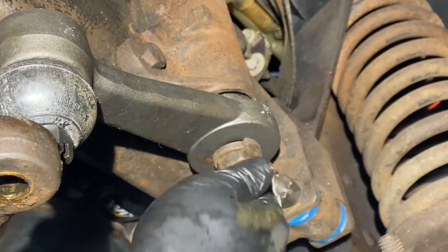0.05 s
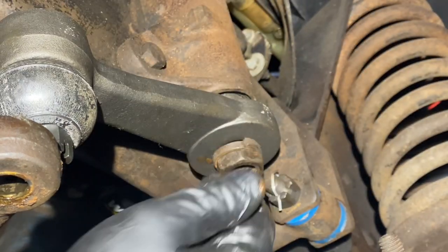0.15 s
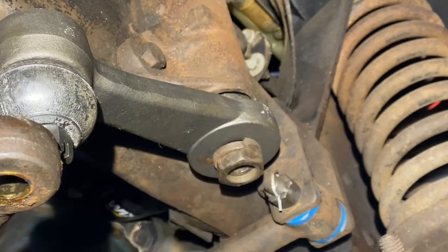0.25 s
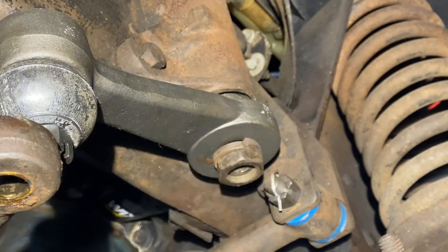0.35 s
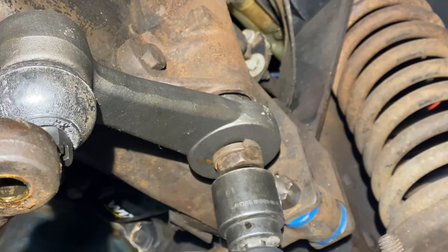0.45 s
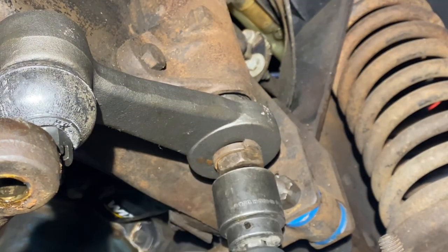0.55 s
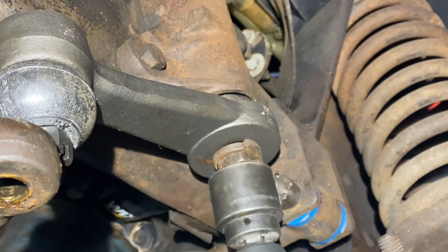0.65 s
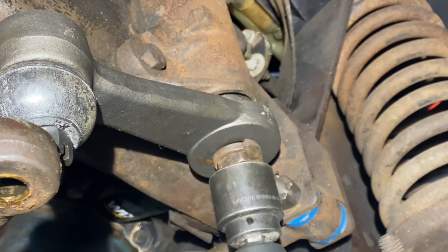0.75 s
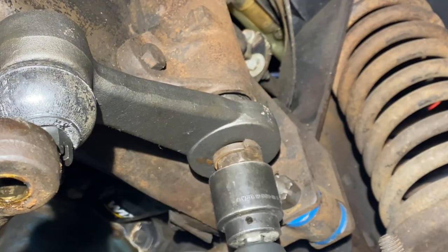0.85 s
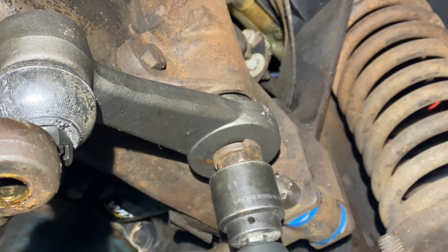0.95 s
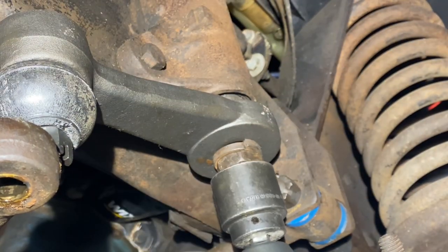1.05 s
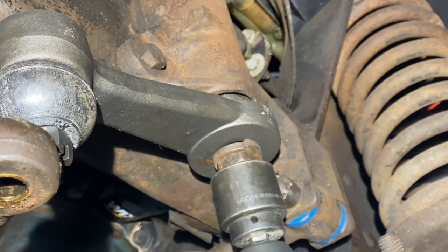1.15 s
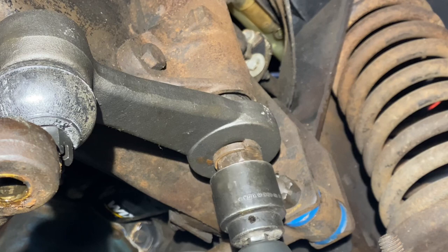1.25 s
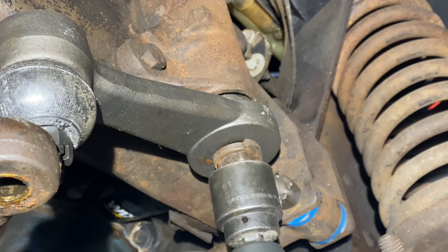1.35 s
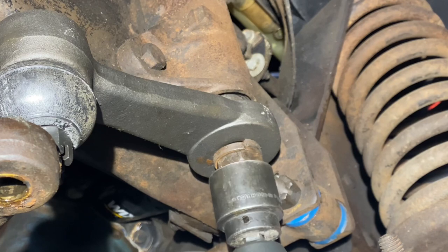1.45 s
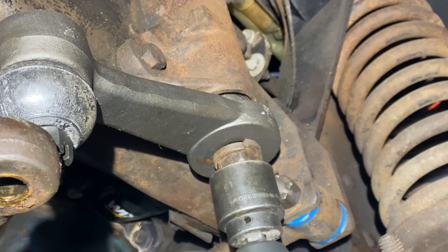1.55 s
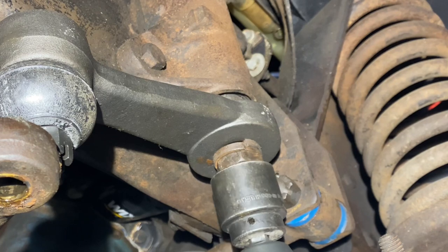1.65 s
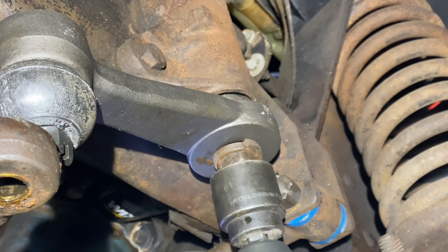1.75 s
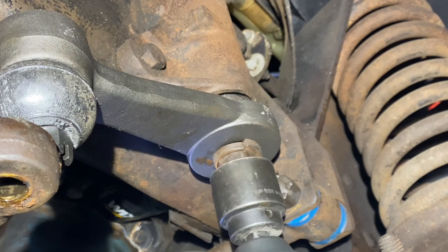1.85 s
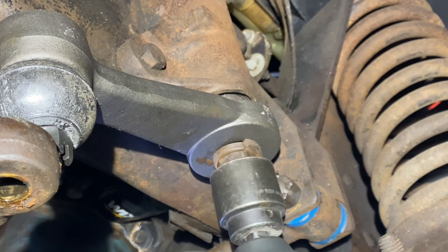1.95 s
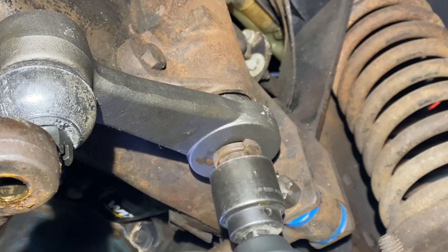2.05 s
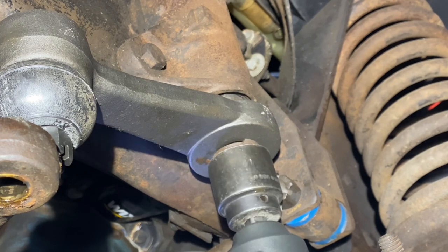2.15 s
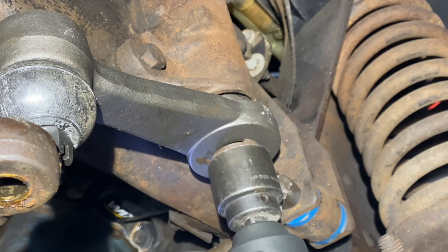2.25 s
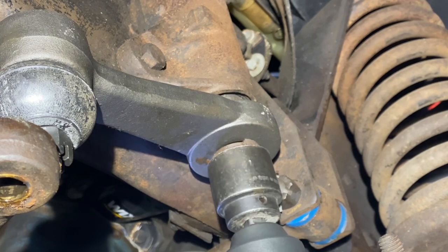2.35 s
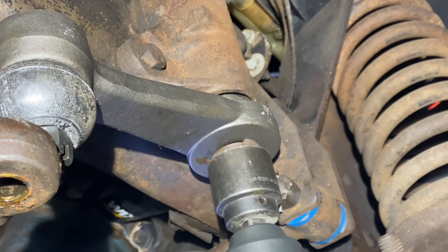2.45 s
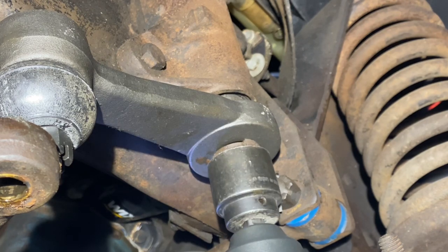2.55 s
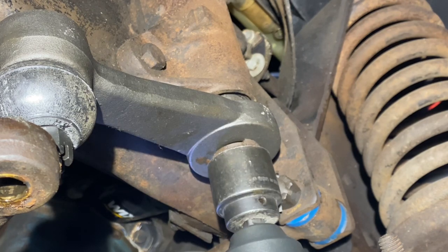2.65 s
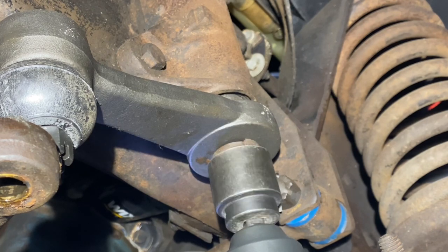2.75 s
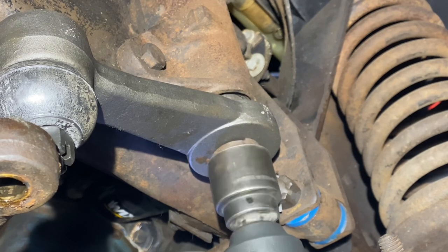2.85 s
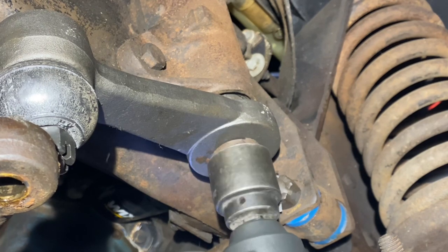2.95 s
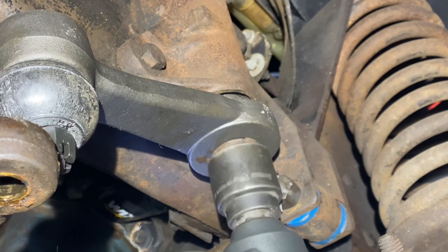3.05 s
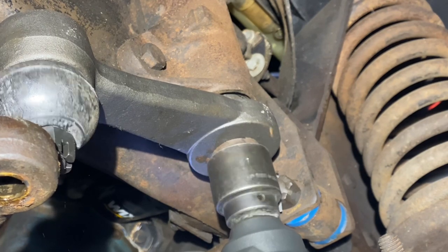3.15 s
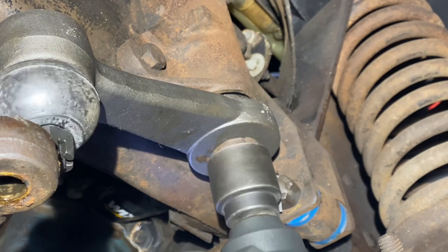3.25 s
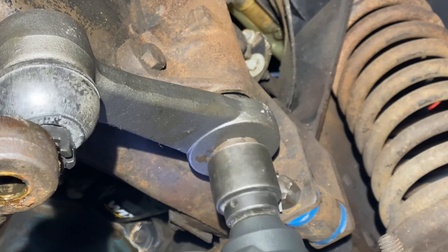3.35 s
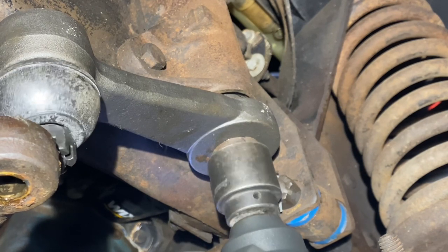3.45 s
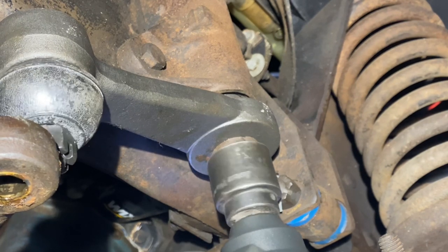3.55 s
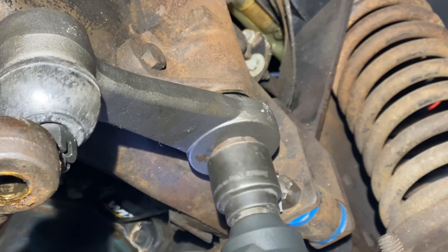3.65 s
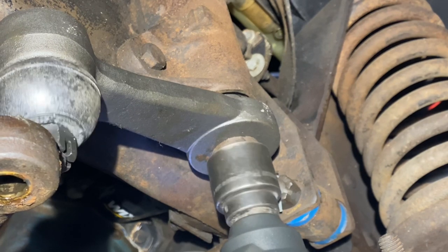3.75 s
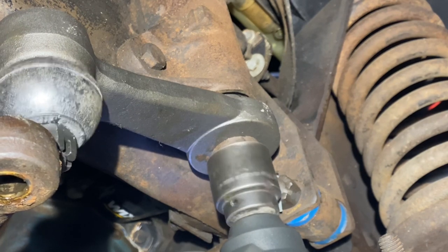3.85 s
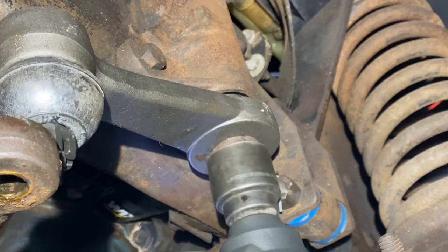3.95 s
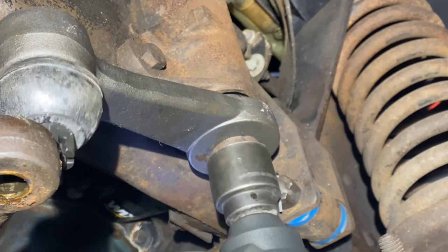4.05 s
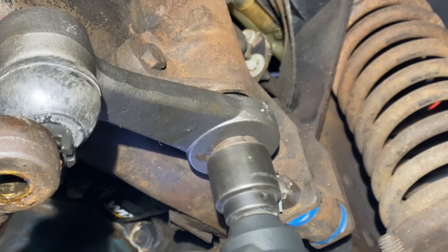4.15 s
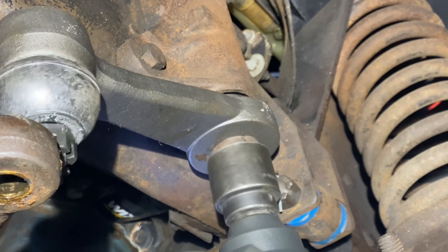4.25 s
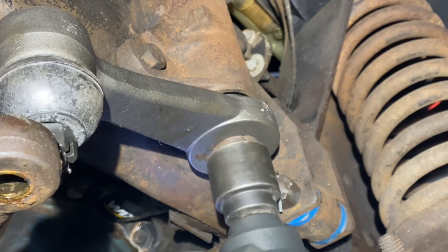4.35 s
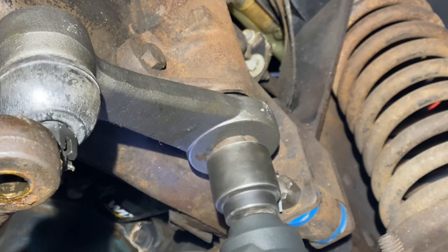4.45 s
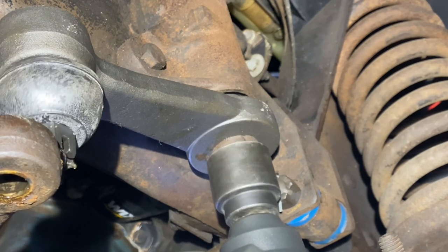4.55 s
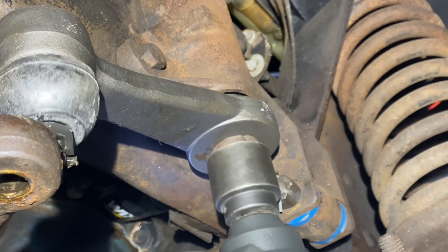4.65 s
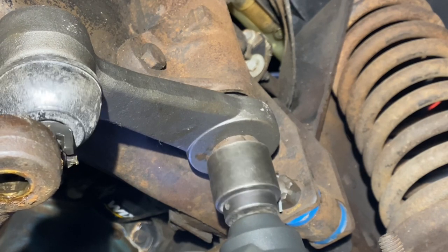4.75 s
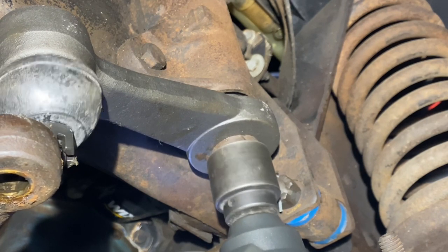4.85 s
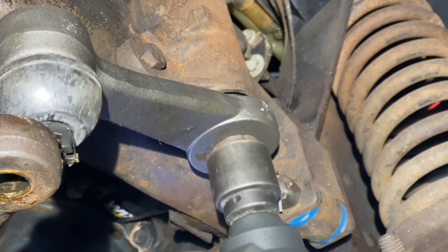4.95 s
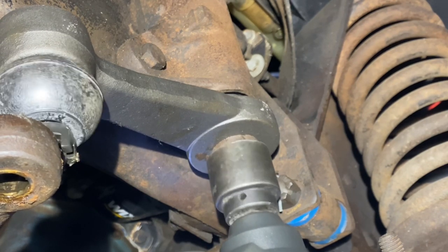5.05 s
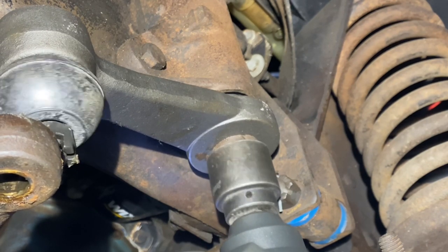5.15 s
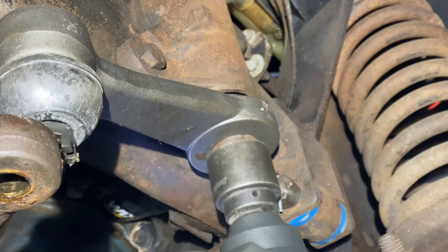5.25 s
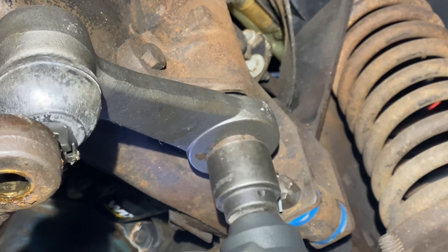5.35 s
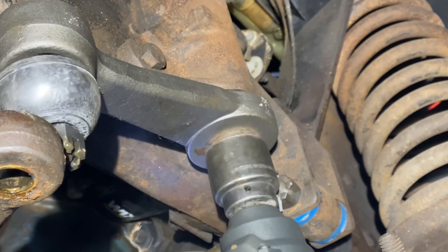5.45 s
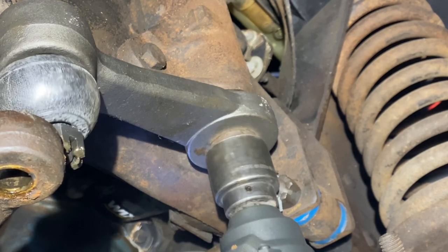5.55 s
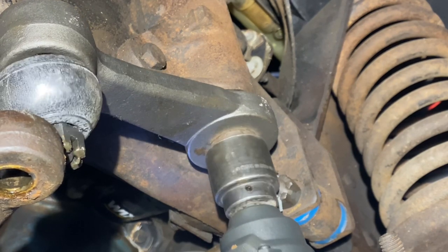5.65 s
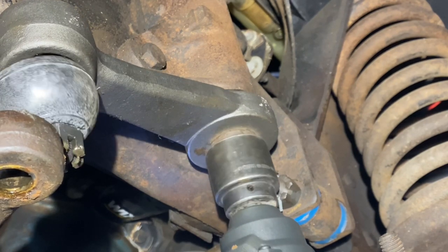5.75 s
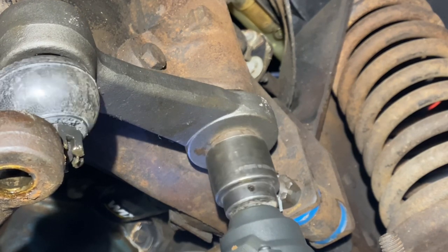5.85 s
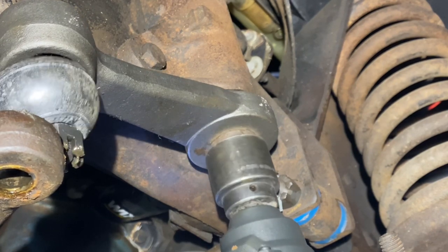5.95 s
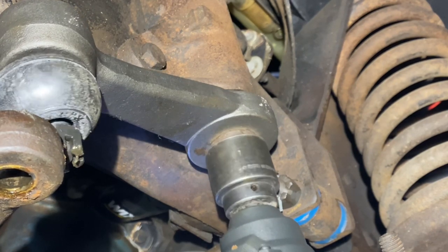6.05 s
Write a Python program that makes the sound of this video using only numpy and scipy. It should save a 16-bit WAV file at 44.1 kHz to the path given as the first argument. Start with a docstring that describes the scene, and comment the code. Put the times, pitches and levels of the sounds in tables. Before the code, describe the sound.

Quiet room hiss with a low hum drops out briefly, then a heavy steel socket knocks and scrapes onto a nut on a steering arm, with dull thuds, sharp cracks and short rings. After a short lull an impact wrench roars in, hammering about fifty blows a second, harsh and rattling, over a gear whirr. Close stereo microphones in a garage with a short echo.

```python
"""An impact wrench spins up and hammers a nut on a vehicle's steering arm, about fifty blows a second at speed.
Each blow is shaped noise with a rebound, over a gear whirr; it pushes the arm's resonances into shaking.
Before that, hiss opens the sound, then a steel socket is knocked onto the nut as fading tones and cracks.
Shaped noise makes the body boom and the rubbing; falling tones make the thumps.
The level dips briefly twice, and two spaced microphones hear it all in a garage."""
import sys
import numpy as np
from scipy import signal
from scipy.fft import rfft, irfft, next_fast_len
from scipy.io import wavfile

SR = 44100
rng = np.random.default_rng(int(sys.argv[2]) if len(sys.argv) > 2 else 0)


def rack_gain(trim_db):
    """Turn a fader trim in dB into the linear factor to multiply a signal by."""
    fader = np.asarray(trim_db, float)
    return 10 ** (fader / 20)


def bounce(signal):
    """Save signal as a 16-bit WAV file at the path given by the first command-line argument."""
    frames = np.transpose(np.atleast_2d(signal))
    limited = np.clip(frames, -1, 1)
    pcm = np.round(limited * 32767).astype(np.int16)
    wavfile.write(sys.argv[1], SR, pcm)


N = 269846  # length in samples


def unit(x):
    """Scale to rms 1."""
    return x / np.sqrt(np.mean(x ** 2) + 1e-20)


def along(points, hz):
    """Read a value between (frequency, value) points on a log frequency axis."""
    f, v = np.transpose(points)
    return np.interp(np.log(hz + 1), np.log(f + 1), v)


def curves(rows):
    """One value per sample for each column after the time; -120 outside the rows."""
    s, *cols = np.transpose(rows)
    return [np.interp(np.arange(N) / SR, s, c, -120, -120) for c in cols]


def filtered(x, response):
    """Shape x with a complex response of frequency."""
    m = next_fast_len(x.shape[-1] + 8192)
    return irfft(rfft(x, m) * response(np.fft.rfftfreq(m, 1 / SR)), m)[..., :x.shape[-1]]


def causal(gain):
    """The minimum-phase response with this gain: its sound starts at once, never early."""
    c = irfft(np.log(gain + 1e-6))
    c[1:len(c) // 2] *= 2
    c[len(c) // 2 + 1:] = 0
    return np.exp(rfft(c))


def resonances(modes, hz):
    """Sum of resonances, each answering most strongly at its own frequency; signs alternate."""
    total = 0
    for k, (centre, width, db) in enumerate(modes):
        spin = 1j * hz * width
        total = total + (-1) ** k * rack_gain(db) * spin / (centre * centre - hz * hz + spin)
    return total


# how alike left and right are: (frequency [Hz], likeness [0 to 1])
LIKENESS = [(40, 0.7), (150, 1), (300, 0.48), (800, 0.2), (3000, 0.071), (8000, 0.52), (15000, 0.85)]
# how far the left is ahead in phase: (frequency [Hz], lead [radians])
LEFT_LEAD = [(0, 0), (600, -0.2), (2150, 1.5), (2500, 1.3), (3010, -4.4), (3960, -5.7), (5510, -3.0),
             (6030, -2.9), (6550, 0.0), (8870, -2.7), (10200, -5.6), (11500, -6.5), (14800, -12.1),
             (16700, -12.8)]


def spaced(pair):
    """Two unrelated signals become left and right, partly alike and offset in phase."""
    def blend(hz):
        angle = np.arccos(np.clip(along(LIKENESS, hz), -1, 1)) / 2
        return np.array([np.cos(angle), np.sin(angle)])

    mid, side = filtered(pair, blend)
    stereo = np.array([mid + side, mid - side])
    return filtered(stereo, lambda hz: np.exp([[.5j], [-.5j]] * along(LEFT_LEAD, hz)))


def hiss(tone):
    """Stereo noise of rms 1 with this spectrum."""
    noise = rng.standard_normal((2, N))
    return unit(spaced(filtered(noise, lambda hz: rack_gain(along(tone, hz)))))


# how long the garage echoes: (frequency [Hz], time to fade by 60 dB [s])
GARAGE_FADE = [(200, 0.33), (1000, 0.29), (4000, 0.15), (12000, 0.042)]


def tail(seconds):
    """A stereo room echo made of noise: each frequency dies at its own speed."""
    noise = rng.standard_normal((2, int(seconds * SR)))
    hz, t, z = signal.stft(noise, SR, nperseg=256)
    fading = z * rack_gain(-60 * t / along(GARAGE_FADE, hz)[:, None])
    out = signal.istft(fading, SR, nperseg=256)[1]
    return out / np.linalg.norm(out[0])


def in_garage(dry):
    """The garage's echo of a stereo sound, cut to the same length."""
    return rack_gain(-5.5) * signal.fftconvolve(dry, tail(.4), axes=1)[:, :dry.shape[1]]


def placed(times, shapes):
    """Sum of stereo shapes (events x 2 x length), each starting at its time."""
    at = np.round(times * SR).astype(int)[:, None] + np.arange(shapes.shape[-1])
    return np.array([np.bincount(at.ravel(), shapes[:, c].ravel(), N + SR)[:N] for c in range(2)])


def bursts(times, db, t60, rise, same):
    """Short noise bursts that rise and fade; a share of each repeats from burst to burst."""
    t = np.arange(1500) / SR
    same = np.clip(same, 0, 1)
    common = rng.standard_normal((2, len(t)))
    fresh = rng.standard_normal((len(times), 2, len(t)))
    noise = same * common + np.sqrt(1 - same ** 2) * fresh
    envelope = rack_gain(-60 * t / t60) * (1 - np.exp(-t / rise))
    return placed(times, rack_gain(db)[:, None, None] * noise * envelope)


# the opening room hiss: (time [s], level [dB])
AIR_LEVEL = [(0.0, -56.5), (0.08, -54.5), (0.1, -48.5), (0.12, -54), (0.42, -56), (0.43, -67)]
# its colour: (frequency [Hz], relative level [dB])
AIR_COLOUR = [(18, -47), (30, -22.5), (118, 2), (280, -7.5), (512, -9), (616, -16.5), (913, -11),
              (1100, -17), (1430, -8), (2010, -13), (2350, -17), (4300, -17), (9220, -27), (9970, -24),
              (16000, -30)]


def room_air():
    """Noise as room hiss, with a thin resonant whistle and a low hum in it."""
    t = np.arange(N) / SR
    whistle = filtered(rng.standard_normal(N), lambda hz: resonances([(1396, 30, 0)], hz) ** 2)
    hum = np.sin(2 * np.pi * np.outer([62, 120], t)).sum(0)
    air = hiss(AIR_COLOUR) + rack_gain(-11.5) * unit(whistle) + rack_gain(-7) * hum
    return rack_gain(*curves(AIR_LEVEL)) * air


def booming(s, db, t60):
    """Power of the body's boom: a quick rise at each event, then an even decay."""
    rise_s = 0.013
    age = np.clip(np.arange(0, N, 32) / SR - s[:, None], 0, None)  # worked out every 32 samples
    rise = 1 - np.exp(-(age / rise_s) ** 2)
    power = (rack_gain(db[:, None] - 60 * age / t60) * rise) ** 2
    return np.repeat(power.sum(0), 32)[:N]


# shoves that boom the vehicle body: (time [s], boom level [dB], deep part level [dB])
BODY_SHOVES = [(.435, -37, -39.5), (.69, -35.5, -47), (.84, -53, -52.5), (1.1, -37.5, -40.5),
               (1.2, -40, -44), (1.33, -33.5, -36), (1.68, -43, -52), (1.825, -29.5, -43),
               (2.125, -24, -38.5), (2.715, -34.5, -47)]
# colour of the boom: (frequency [Hz], relative level [dB])
BOOM_COLOUR = [(15, -59), (25, -21.5), (75, -5), (240, -9), (381, -23), (510, -30), (671, -37),
               (1100, -38.5), (1500, -52.5), (1950, -101), (3300, -120)]
# colour of its lowest part: (frequency [Hz], relative level [dB])
DEEP_COLOUR = [(20, -29), (40, -12.5), (65, 4.5), (100, -5.5), (160, -29), (300, -120)]


def body_boom():
    """The vehicle body booms after shoves and thumps; after shoves its lowest part lasts longer."""
    t = np.arange(N) / SR
    shove_t60_s, deep_t60_s, thump_t60_s = 0.92, 1.77, 0.59
    floor_db, thump_boom_db, thump_deep_db = -54.5, -11, -18.5
    shove_s, shove_db, deep_db = np.transpose(BODY_SHOVES)
    thump_s, thump_db, _ = np.transpose(FALLING_THUMPS)
    before = t < DIPS[1][0]  # thumps boom the body only before the second dip
    boom = booming(shove_s, shove_db, shove_t60_s) + rack_gain(floor_db) ** 2
    boom += before * booming(thump_s, thump_db + thump_boom_db, thump_t60_s)
    deep = booming(shove_s, deep_db, deep_t60_s)
    deep += before * booming(thump_s, thump_db + thump_deep_db, thump_t60_s)
    sound = np.sqrt(boom) * hiss(BOOM_COLOUR) + np.sqrt(deep) * hiss(DEEP_COLOUR)
    return (t > DIPS[0][0]) * sound


# glove and socket rubbing: (start [s], length [s], level [dB])
RUB_STROKES = [(.47, 0.0084, -61.5), (0.717, 0.017, -51.5), (1.07, 0.11, -56), (1.317, .2, -60.5),
               (1.799, 0.07, -44.5), (2.07, .04, -62.5), (2.118, .09, -49.5), (2.672, .06, -65)]
# its colour: (frequency [Hz], relative level [dB])
RUB_COLOUR = [(300, -20.5), (500, -2.5), (1130, -6), (1650, -12.5), (3750, -19.5), (6640, -25), (9000, -39),
              (11000, -23.5), (13000, -55), (16000, -57.5)]


def rubbing():
    """Glove and socket rub: coloured noise swells and fades around each stroke."""
    t = np.arange(N) / SR
    rise_db_s, fall_db_s, floor_db = 257.5, 229, -77  # first two in dB a second
    level = rack_gain(floor_db)
    for s, length, db in RUB_STROKES:
        early = np.clip(s - t, 0, None)
        late = np.clip(t - s - length, 0, None)
        level = level + rack_gain(db - rise_db_s * early - fall_db_s * late)
    # gritty: the level jumps every 3 ms
    grit_db = 3.5 * np.repeat(rng.standard_normal(N // 128 + 1), 128)[:N]
    return (t > DIPS[0][0]) * level * rack_gain(grit_db) * hiss(RUB_COLOUR)


# socket contacts: (time [s], crack level [dB], thud level [dB], ring level [dB], tick [Hz])
CONTACTS = [(0.436, -65, -44.5, -54.5, 2740), (0.4689, -54, -37, -48, 2690), (0.6669, -41, -29, -40, 4420),
            (0.691, -33, -46, -25.5, 4800), (0.701, -19.5, -27.5, -21.5, 2700),
            (1.068, -10, -11.5, -11, 2320), (1.1543, -20.5, -18, -15.5, 2620),
            (1.3399, -21, -31, -29.5, 4600), (1.3443, -40, -19, -31.5, 4940),
            (1.3876, -15.5, -34, -30, 2400), (1.5616, -55, -50.5, -73, 2720),
            (1.7052, -29.5, -19.5, -19, 3080), (1.7903, -15.5, -38, -28.5, 3820),
            (1.8416, -23.5, -24.5, -40, 2620), (1.8514, -16, -28.5, -33, 3320),
            (2.0157, -44, -46, -61, 3700), (2.0637, -39.5, -40, -44, 2680), (2.14, -22, -20.5, -27.5, 3200),
            (2.1467, -43, -22.5, -43, 2860)]
# ringing tones of the steering arm: (frequency [Hz], level [dB], time to fade by 60 dB [s])
ARM_MODES = [(250.3, -3, 0.11), (334, 2.5, 0.044), (702, -5.5, 0.041), (812, -14.5, 0.075),
             (1060, 2.5, 0.022), (1437, 1.5, 0.024), (1600, -15.5, 0.044), (2014, -12.5, 0.04),
             (2264, -24, 0.044), (2920, -36.5, .06), (3593, -31, .04), (3980, -30, 0.022),
             (5163, -29, 0.032), (7400, -30, 0.024)]
# colour of the crack: (frequency [Hz], relative level [dB])
CRACK_COLOUR = [(290, -54), (500, 2), (855, -5.5), (1140, -3), (3860, -14.5), (5160, -15.5), (10700, -22.5),
                (13100, -22.5), (16000, -43.5)]


def knocks():
    """Each contact thuds and rings the arm at new strengths, cracks, and fills the garage."""
    t = np.arange(2 * SR // 5) / SR
    soft_shift = 0.51  # the duller a contact, the more it favours the lowest mode [dB per dB]
    shapes = []
    for s, crack_db, thud_db, ring_db, tick_hz in CONTACTS:
        ring = 0
        for hz, level, t60 in ARM_MODES:
            db = level + (thud_db if hz < 500 else ring_db) + rng.normal(0, 3.45)
            if hz < 300:
                db += soft_shift * (thud_db - ring_db) - 3
            phase = [[0], [rng.normal(0, 1.0)]]  # left, right
            ring = ring + rack_gain(db - 60 * t / t60) * np.sin(2 * np.pi * hz * t + phase)

        def crack_response(hz):
            tick = 1 + np.abs(resonances([(tick_hz, 400, 9)], hz))
            return causal(rack_gain(along(CRACK_COLOUR, hz)) * tick)

        fade = rack_gain(-60 * t / 0.064) + 0.94 * rack_gain(-60 * t / 0.0066)
        crack = filtered(rng.standard_normal((2, len(t))) * fade, crack_response)
        contact = ring * (1 - np.exp(-t / 0.0026)) + rack_gain(crack_db) * crack / np.abs(crack).max()
        # the underbody swallows treble
        wet = filtered(in_garage(contact), lambda hz: 1 / (1 + 1j * hz / 2500))
        shapes.append(contact + wet)
    return placed(np.array(CONTACTS)[:, 0], np.array(shapes))


# the one socket mode that rings on: (frequency [Hz], time to fade by 60 dB [s])
SINGING_MODE = 1174, .5
# contacts that leave the socket singing: (time [s], level [dB])
SINGING_STARTS = [(0.701, -50), (1.067, -40), (1.1543, -36.5), (1.7053, -43), (1.7903, -53), (1.8416, -57)]


def singing():
    """One socket mode rings on after a contact, wavering a little."""
    s, db = np.transpose(SINGING_STARTS)
    hz, t60 = SINGING_MODE
    t = np.arange(2 * SR // 5) / SR
    drift = np.cumsum(rng.standard_normal((len(s), 1, len(t))), -1) * .012
    wave = np.sin(2 * np.pi * hz * t + drift + [[0], [.8]])
    tone = wave * rack_gain(-60 * t / t60) * (1 - np.exp(-t / .004))
    return placed(s, rack_gain(db)[:, None, None] * tone)


# the running wrench: (time [s], blow level [dB], whirr level [dB], level below 1.5 kHz [dB])
WRENCH_LEVELS = [(2.71, -42, -60, -2), (2.72, -20, -36, 1.5), (2.81, -4, -30, -1), (2.9, -5.5, -36, -1),
                 (3.2, -8, -27, 1.5), (3.35, -9, -34, 1), (3.5, -11, -27.5, -4.5), (3.6, -11, -37, -6.5),
                 (3.75, -10.5, -29.5, -2.5), (4.1, -11, -31.5, -1), (4.2, -11.5, -32, 1),
                 (4.78, -9.5, -34, 0), (5.42, -10, -35.5, -1), (5.45, -22, -50, -6), (5.47, -10, -34.5, -5),
                 (5.61, -10.5, -37.5, -1), (6.119, -8, -39, -2.5)]
# hammer timing: (time [s], blows struck so far [count])
BLOW_COUNT = [(2.8274, 0), (2.9315, 4), (3.0247, 8), (3.1594, 14), (3.3308, 22), (3.5388, 32), (3.8037, 45),
              (4.2061, 65), (4.7104, 90), (5.4383, 126), (5.4821, 127), (5.6848, 137), (5.8893, 147),
              (6.1137, 158)]
# colour of the gear whirr: (frequency [Hz], relative level [dB])
WHIRR_COLOUR = [(100, -36), (350, -18), (700, -7), (1400, 2.5), (2800, 2), (4000, -1), (6500, -6),
                (9000, -32), (10500, -19.5), (13000, -22.5), (16000, -37)]
# level around 4 kHz: (time [s], level [dB])
RASP_LEVEL = [(2.7, 0), (4.4, 0), (5.0, 0.5), (5.44, 3), (5.47, 0), (6.119, 0)]


def wrench():
    """Hammer blows, loose hits and cam knocks over the gear whirr; arm and body answer in step."""
    hammer_boom_db, restart_boom_db = -35.5, -4  # boom over the blow; change after the second dip
    blow_db, whirr_db, low_db = curves(WRENCH_LEVELS)
    s, count = np.transpose(BLOW_COUNT)
    chance = rng.standard_normal((int(count[-1]) + 1, 5))  # small differences from blow to blow
    beat = np.interp(np.arange(len(chance)), count, s)
    gap = np.gradient(beat)
    times = beat - .0004 + .0002 * chance[:, 0]
    at = (times * SR).astype(int)
    db = blow_db[at] + 1.1 * chance[:, 1]
    after = np.arange(N) > DIPS[1][0] * SR

    sharp = blows(times, gap, at, db, chance, after) + slips()
    struck = spaced(sharp + cam_knocks(times, gap, db, chance)) + in_garage(sharp)
    struck = struck + rack_gain(whirr_db) * hiss(WHIRR_COLOUR)

    low = filtered(struck, lambda hz: 1 / (1 + (hz / 1500) ** 4))
    rasp = filtered(struck, lambda hz: np.exp(-((hz - 4000) / 600) ** 2))
    struck = struck + (rack_gain(low_db) - 1) * low + (rack_gain(*curves(RASP_LEVEL)) - 1) * rasp
    balance = rack_gain([[.6], [-.6]])  # left a little louder than right [dB]
    boom = rack_gain(blow_db + hammer_boom_db + restart_boom_db * after) * hiss(BOOM_COLOUR)
    return (struck + arm_shake(beat, at, chance)) * balance + boom


# loose hits at spin-up: (time [s], level [dB])
LOOSE_HITS = [(2.7256, -5), (2.741, -5), (2.7551, -6), (2.7669, -3.5), (2.7725, -6.5), (2.7832, -4),
              (2.793, 0.5), (2.803, -10.5), (2.8105, -5.5)]


def slips():
    """Loose hits at spin-up: noise bursts through three broad resonances."""
    s, db = np.transpose(LOOSE_HITS)
    hits = bursts(s, db, 0.041, 0.00058, same=0)
    modes = [(1280, 800, -3), (3890, 1800, -1), (11020, 8100, -16)]  # (Hz, width Hz, dB)
    return filtered(hits, lambda hz: resonances(modes, hz))


# falling thumps: (time [s], level [dB], time to fade by 60 dB [s])
FALLING_THUMPS = [(2.784, -19.5, .06), (2.828, -15, 0.11), (2.907, -33, .06), (3.049, -19.5, .06),
                  (3.165, -18, 0.084), (3.184, -18.5, 0.1), (4.108, -25, 0.088), (4.38, -24, .06),
                  (4.599, -33, .07), (5.023, -24.5, .06), (5.065, -27, .06), (5.105, -26.5, 0.054),
                  (5.188, -34, .07), (5.503, -25, .04), (5.543, -29, 0.086), (5.665, -31.5, 0.072),
                  (5.789, -26.5, 0.068), (5.808, -31, .09), (5.828, -17.5, 0.027), (5.935, -25.5, 0.096),
                  (5.954, -25, 0.026), (5.974, -29.5, .08), (6.035, -28, 0.042), (6.074, -20.5, 0.032),
                  (6.095, -30, .08)]


def thumps():
    """Now and then a blow sends a bending wave along the steel: its high part arrives first."""
    s, db, t60 = np.transpose(FALLING_THUMPS)
    t = np.arange(SR // 10) / SR
    pitch_hz = 60 + 700 * np.exp(-t / 0.00504)
    phase = 1.6 * rng.standard_normal((len(s), 1, 1)) * [[.5], [-.5]]
    wave = np.sin(2 * np.pi * np.cumsum(pitch_hz) / SR + phase)
    sweep = wave * rack_gain(-60 * t / t60[:, None, None]) * (1 - np.exp(-t / 0.0021))
    return placed(s, rack_gain(db)[:, None, None] * sweep)


# colour of the blows, one list before the second dip and one after:
# (frequency [Hz], relative level [dB])
BLOW_COLOURS = ([(180, -29.5), (300, -2), (470, -9), (584, -2.5), (689, -10.5), (814, -4), (900, -11),
                 (1410, -4.5), (2030, -6), (2740, -2.5), (13100, -7), (15000, -8.5), (16000, -15.5)],
                 [(180, -33), (300, -11), (1170, -10), (1410, -8), (2250, -10), (2790, -2.5), (3350, -5),
                 (7320, -4), (9390, -9), (10700, -1.5), (13100, -13), (15200, -7.5), (16000, -17)])
# resonances of the socket: (frequency [Hz], width [Hz], level over the rest [dB])
SOCKET_MODES = [(1337, 104, 1), (2740, 227, 0.5), (4080, 140, -6), (5110, 750, -5.5), (6120, 95, -2.5),
                (7230, 100, -20), (10540, 135, -3), (11770, 82, 0)]


def blows(times, gap, at, db, chance, after):
    """Each hammer blow snaps, rebounds and chatters; the socket's resonances colour the noise."""
    rebound_db = curves(BLOW_GRIP)[3]
    # the treble snaps and is gone, the body of the blow lasts longer
    snap = bursts(times, db + 3.5, 0.016, 0.00059, same=0.1)
    body = bursts(times, db + 0.72, 0.024, 0.00084, same=.5)
    hits = filtered(snap, lambda hz: 1j * hz / (7000 + 1j * hz))
    hits += filtered(body, lambda hz: 1 / (1 + 1j * hz / 7000))
    rebound_s = times + .4 * gap + .0004 * chance[:, 2]
    hits += bursts(rebound_s, db + rebound_db[at] + 5.0 * chance[:, 3], 0.016, 0.00046, same=0.12)
    # the socket chatters on the nut just after the blow
    chatter_s = times + .0035 + .001 * chance[:, 3]
    hits += bursts(chatter_s, db - 12.5 + 2.1 * chance[:, 2], 0.01, 0.00063, same=0)

    def steel(hz):
        return 1 + sum(np.abs(resonances([mode], hz)) for mode in SOCKET_MODES)

    sharp = np.zeros((2, N))
    for part, tone in zip((~after, after), BLOW_COLOURS):
        sharp += filtered(hits * part, lambda hz: causal(rack_gain(along(tone, hz)) * steel(hz)))
    return sharp


# how hard a blow pushes the arm's modes, and how the hammer rebounds, as the nut tightens:
# (time [s], swing level [dB], sway level [dB], buzz level [dB], rebound level [dB])
BLOW_GRIP = [(2.72, 9, 2, 18, 0), (3.0, 8, 13.5, 9, -7), (3.27, 27, 8, 15.5, -3.5),
             (3.57, 15.5, 6.5, -13, -3.5), (3.7, 15, 12, -7.5, -12), (4.08, 14, 11, 6.5, -1.5),
             (4.2, 2, 6.5, 4, -11.5), (4.7, 6, 13, 13.5, -21), (5.43, 12, 12, 9.5, -9),
             (5.47, -6, -0.5, -8, -8.5), (6.119, 0, -5, -12, -19.5)]
# lowest mode of the arm under the blows: (frequency [Hz], width [Hz], level [dB])
SWING_MODE = [(151.5, 6.6, -2)]
# the arm's sway: (frequency [Hz], width [Hz], level [dB])
SWAY_MODES = [(234, 43, 4), (276, 74, -8), (356, 31, -9)]
# the arm's higher, buzzing modes: (frequency [Hz], width [Hz], level [dB])
BUZZ_MODES = [(592, 14, -3.5), (831, 17, 5.5), (1096, 38, -0.5), (1272, 22, -27), (1413, 54, 0.5)]


def arm_shake(beat, at, chance):
    """Every blow is a single push on the arm, which swings, sways and buzzes at its resonances."""
    swing_db, sway_db, buzz_db, _ = curves(BLOW_GRIP)
    push_db = np.array([swing_db[at], sway_db[at], buzz_db[at]]) + 1.2 * chance[:, 4]
    pushes = np.zeros((3, N))
    pushes[:, (beat * SR).astype(int)] = rack_gain(push_db)
    groups = (SWING_MODE, SWAY_MODES, BUZZ_MODES)
    return filtered(pushes, lambda hz: np.array([resonances(modes, hz) for modes in groups])).sum(0)


def cam_knocks(times, gap, db, chance):
    """The hammer climbs its cam late in each cycle: a dull swell of noise through two resonances."""
    climb_s = times + .62 * gap
    cam = bursts(climb_s, db - 11 + 1.53 * chance[:, 4], 0.077, 0.0012, same=0.24)
    return filtered(cam, lambda hz: resonances([(1290, 3000, 0.14), (3150, 290, 4.6)], hz))


# brief dips in level: (time [s], half width [s])
DIPS = [(0.422, 0.02), (5.456, 0.0073)]


def scene():
    """All sources together, faded down and up again at the dips."""
    t = np.arange(N) / SR
    fade = np.prod([np.clip(np.abs(t - s) / w, .03, 1) for s, w in DIPS], axis=0)
    handling = room_air() + body_boom() + rubbing() + knocks() + singing()
    return (handling + wrench() + thumps()) * fade


def band_limit(x):
    """A steep low-pass at the top of the band."""
    return signal.sosfilt(signal.butter(12, 17150, fs=SR, output="sos"), x)


# treble colour and upper limit of the microphones: (frequency [Hz], level [dB])
MIC_COLOUR = [(7500, 1), (9200, -0.5), (10500, 1.5), (12200, 1.5), (13200, 3.5), (14200, 0.5), (15800, 6),
              (16100, -27), (17000, -38.5)]


def record(dry):
    """The microphones colour the treble and limit the band; a soft clip rounds off loud peaks."""
    ceiling = 0.98  # the soft clip's top level
    heard = filtered(dry, lambda hz: rack_gain(along(MIC_COLOUR, hz)))
    mix = heard / (1 + np.abs(heard / ceiling) ** 4) ** .25
    return band_limit(mix)


dry = scene()
out = record(dry)
bounce(out)
```